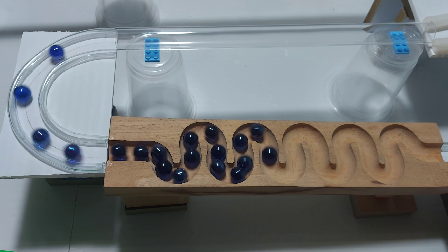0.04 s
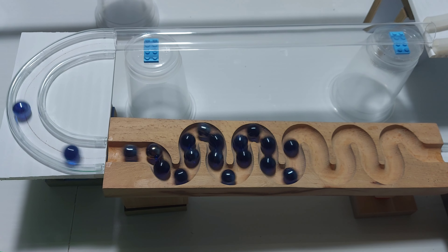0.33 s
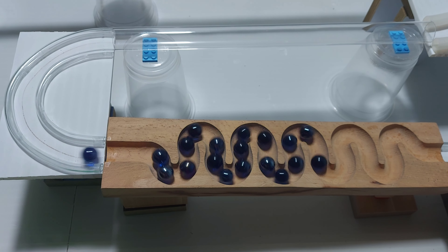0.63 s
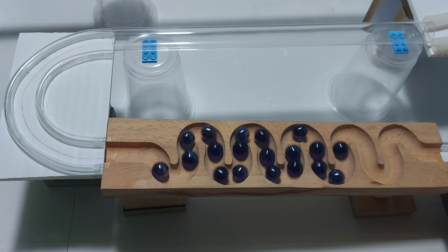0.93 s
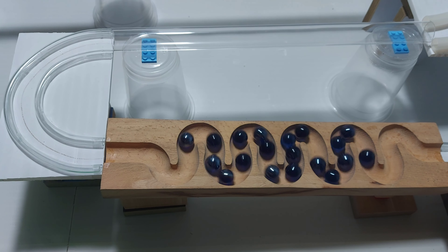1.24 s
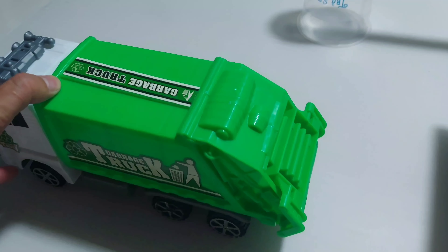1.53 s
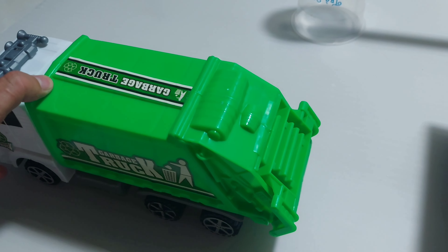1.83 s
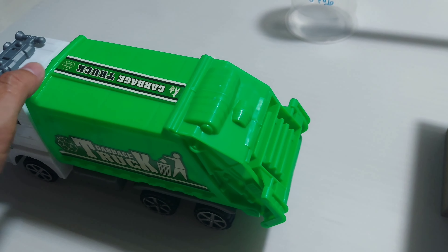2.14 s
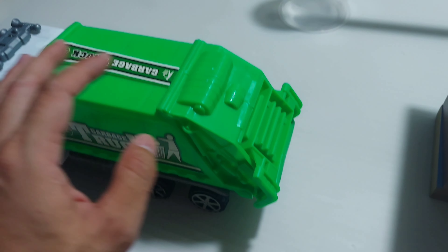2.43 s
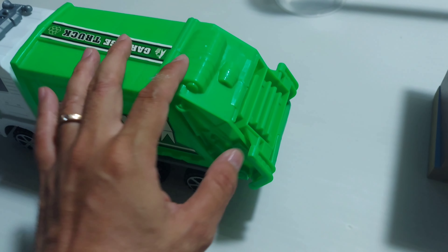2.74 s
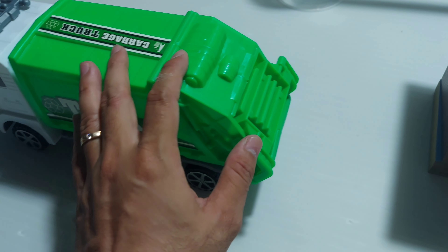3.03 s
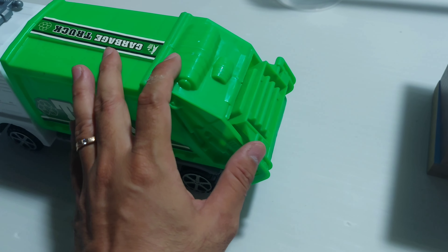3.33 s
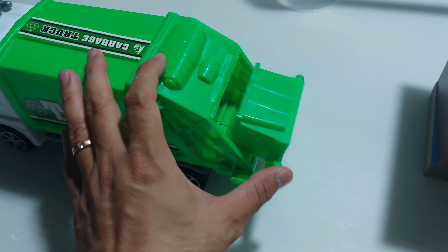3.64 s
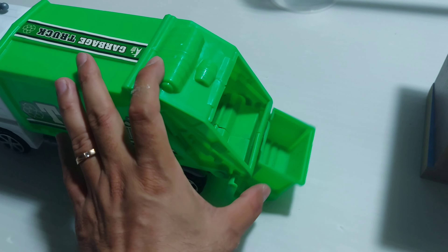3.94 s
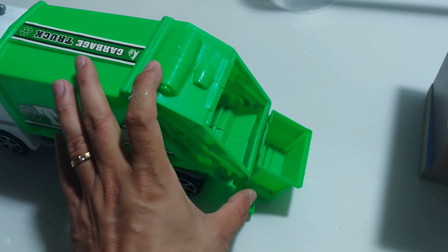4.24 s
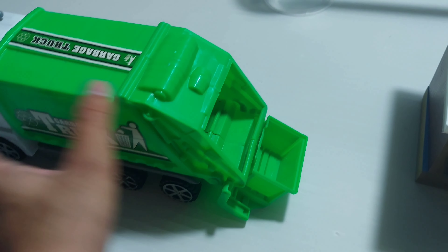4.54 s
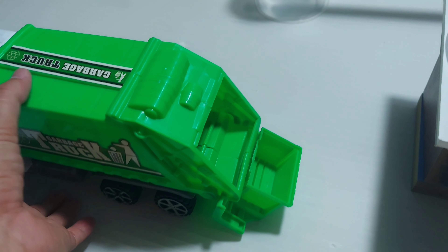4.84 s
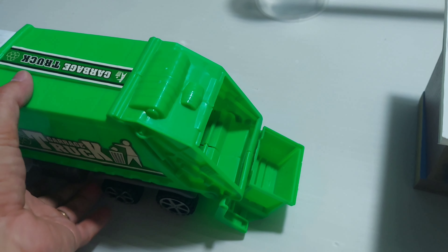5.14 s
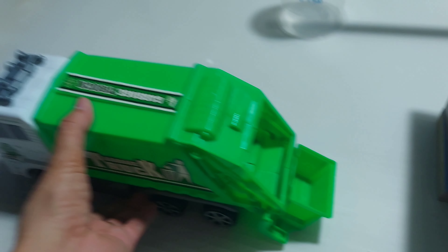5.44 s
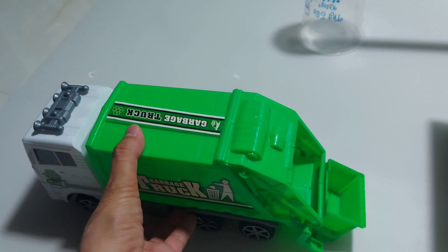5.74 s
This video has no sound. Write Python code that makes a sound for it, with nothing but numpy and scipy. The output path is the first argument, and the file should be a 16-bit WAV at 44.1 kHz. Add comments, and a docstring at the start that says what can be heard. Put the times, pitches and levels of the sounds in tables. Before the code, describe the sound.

From the start, glass marbles hum faintly around a plastic bend and drop onto a winding wooden track with loud, woody tocks until about 0.9 seconds. They roll and click brightly against each other, gradually fading. At 1.4 seconds the sound cuts abruptly to much quieter handling of a hollow plastic toy truck, with brief wheel shuffles, light knocks and dull table bumps. From about 2.3 seconds fingers rub the shell and its panels tick irregularly, with a faint squeak near 2.9. At 3.85 seconds the rear bin falls open with a sharp, hollow clack and rattles briefly on its hinge. A softer knock follows at 4.4. Rubbing, ticks and low thuds continue, and the truck slides on its wheels from about 5.5 to 5.8 seconds. Everything is heard close up in a small room, over a faint low hum and hiss.

```python
"""Marble run, then toy truck

Glass marbles hum off a plastic bend, knock onto a winding wooden track, roll and click together.
At 1.434 s the scene cuts to a hollow plastic toy truck on the same table. A hand rubs and shifts it:
skin sticks and slips, panels tick, the table thuds. The rear bin flips open with a clack and rattles.
Blows are decaying modes plus noise; rolling and rubbing are filtered trains of tiny contacts.
Small room, heard close up through two microphone ports."""
import sys
import numpy as np
from scipy import signal
from scipy.fft import rfft, irfft, next_fast_len
from scipy.io import wavfile
from scipy.ndimage import uniform_filter1d

SR = 44100
rng = np.random.default_rng(int(sys.argv[2]) if len(sys.argv) > 2 else 0)


def bounce(signal):
    """Save signal as a 16-bit WAV file at the path given by the first command-line argument."""
    frames = np.transpose(np.atleast_2d(signal))
    limited = np.clip(frames, -1, 1)
    pcm = np.round(limited * 32767).astype(np.int16)
    wavfile.write(sys.argv[1], SR, pcm)


N = 255768
TIME_S = np.arange(N) / SR
BLOW_S = np.arange(8192) / SR

# room murmur spectrum: f/Hz, level/dB
MURMUR_SPECTRUM = [(15, -60.5), (25, -28), (40, -18), (59, -2), (151, -14.5), (188, -10), (210, -10),
                   (238, -9.5), (554, -17.5), (2000, -24), (2600, -60), (4400, -120)]
# hiss spectrum: f/Hz, level/dB
HISS_SPECTRUM = [(900, -67), (1700, -11), (2200, -3.5), (2850, 5), (3300, -11), (4100, -10), (5100, -3),
                 (5700, -14), (6400, -7.5), (7500, -8.5), (8800, -13.5), (10800, -12), (13000, -26.5),
                 (16000, -46.5)]
# glass rolling on wood: f/Hz, level/dB
ROLL_SPECTRUM = [(76, -39.5), (130, -18.5), (331, -5.5), (428, -11.5), (533, -3.5), (929, -9.5), (1300, -3),
                 (1650, -14), (2100, -7), (2320, -12), (2940, -19), (3660, -25), (3960, -20.5), (7480, -32),
                 (15000, -41)]
# jostling in the marble queue: t/s, level/dB
JOSTLE_LEVELS = [(0, -36), (.17, -34.5), (.25, -40), (.4, -38.5), (.52, -45), (.72, -45), (1.05, -52),
                 (1.2, -52), (1.4, -45)]
# marbles landing and bouncing on the track: t/s, level/dB
LANDINGS = [(0.0024, -6), (0.0304, -12), (0.0567, -18.5), (0.0788, -5.5), (0.1228, -11), (0.1486, -17.5),
            (0.2302, -6.5), (0.2732, -14), (0.2996, -18.5), (0.3397, -5.5), (0.3832, -12.5), (0.5289, -6.5),
            (0.566, -10.5), (0.609, -20), (0.6526, -14), (0.7057, -24), (0.7647, -4), (0.8051, -11),
            (0.8476, -22.5), (0.887, -21.5)]
# wooden track modes: f/Hz, level/dB, t60/s
WOOD_MODES = [(308, -37, 0.059), (460, -24.5, 0.031), (646, -40, 0.08), (1246, -16, 0.023),
              (1328, -20.5, 0.028), (2075, -22.5, 0.064), (2280, -31, 0.033), (2370, -26.5, 0.036),
              (2650, -30.5, .055), (3128, -10, 0.024), (3183, 6, 0.0093), (3307, -13, 0.024),
              (3420, -26, 0.023), (3950, -32.5, 0.095), (4610, -6.5, 0.0057)]
# marble against marble: t/s, level/dB, brightness/dB
MARBLE_CLICKS = [(0.037, -12, -12), (0.059, -17.5, -5), (0.082, -16, -7), (0.1568, -15.5, -8),
                 (0.262, -16.5, -4.5), (0.3126, -11, -2), (0.3396, -16, -5), (0.3663, -16, -5),
                 (0.3876, -14.5, -8), (0.408, -10, -1), (0.4341, -14.5, -2), (0.4537, -23, -1),
                 (0.4703, -12.5, -7), (0.6183, -14.5, -13), (0.6245, -18.5, -6), (0.6475, -13.5, -8.5),
                 (0.704, -16.5, -11), (0.73, -16, -10.5), (0.8033, -14.5, -11), (0.825, -17.5, -8),
                 (0.9416, -15.5, -9), (0.991, -19.5, -11), (1.047, -25, -8), (1.1173, -19, -9.5),
                 (1.1734, -16.5, -6), (1.2282, -16.5, -8.5), (1.279, -24.5, -10), (1.3164, -25.5, -12),
                 (1.3348, -21, -5.5), (1.3645, -29, -21)]
# ring of a click in the groove: f/Hz, level/dB, t60/s
GROOVE_MODES = [(5300, -11.5, .008), (6650, -0.5, 0.0082), (7710, -2, 0.011), (8880, 4, 0.004),
                (10800, 8, 0.0032), (13300, 1.5, 0.0026)]
# fingers rubbing the truck: t/s, level/dB
RUB_LEVELS = [(1.46, -70), (2.0, -67.5), (2.6, -60.5), (2.88, -56.5), (3.2, -57), (3.6, -64), (4.0, -58.5),
              (4.6, -62), (5.8, -58.5)]
# skin on plastic: f/Hz, level/dB
RUB_SPECTRUM = [(500, -35), (850, -10.5), (1000, -3.5), (1200, -1), (1400, -7.5), (1700, -6.5), (2200, 0),
                (3200, -15.5), (4200, -16.5), (5500, -27.5), (9000, -32)]
# palm pressing on the shell: t/s, level/dB
PALM_LEVELS = [(2.5, -70), (2.85, -60.5), (3.6, -62), (4.0, -56), (4.7, -56.5), (5.8, -60.5)]
# truck and hand sliding: t/s, half width/s, wheel level/dB, skin level/dB
SLIDE_MOVES = [(1.483, 0.062, -62.5, -68), (1.739, .13, -62, -73), (4.775, .035, -76.5, -61),
               (5.595, 0.052, -58, -76), (5.79, 0.12, -59.5, -64.5)]
# hand and wheel bumps reaching the table: t/s, level/dB
TABLE_BUMPS = [(1.629, -48), (1.829, -51.5), (2.172, -54.5), (2.404, -50.5), (2.653, -59), (2.926, -66),
               (3.151, -58), (3.498, -60), (3.86, -66), (4.021, -57), (4.271, -50), (4.401, -61),
               (4.56, -48), (4.741, -43), (4.846, -47.5), (5.124, -49), (5.211, -45.5), (5.32, -45.5),
               (5.394, -49), (5.548, -40), (5.758, -42)]
# truck knocks, the bin's fall loudest: t/s, level/dB, deep boom/dB, hollow ring/dB, sharp edge/dB
TRUCK_KNOCKS = [(1.644, -56, 13, 8.5, -8), (1.741, -61.5, 12, 14, -8), (1.822, -49, 1.5, 10, -2.5),
                (1.918, -55.5, -7.5, 7.5, -13.5), (3.8485, -23.5, 6.5, 0, 5.5), (3.953, -34, -8, 7, 1),
                (4.39, -36.5, 6.5, 6.5, -4), (4.409, -44.5, 15, 6, -1), (5.614, -45, -2, -5, -20)]
# truck shell modes before extra damping: f/Hz, level/dB, t60/s
SHELL_MODES = [(307, -10.5, 0.15), (372, -5.5, 0.026), (483, -9, 0.092), (542.5, 5, 0.034), (678, 7, 0.029),
               (731, 13, 0.021), (1090, 7, 0.023), (1356, 11, 0.02), (2086, -5.5, 0.06),
               (2850, -3.5, 0.018), (3240, 21.5, 0.0029)]
# plastic ticking under the fingers: t/s, level/dB, brightness/dB
PANEL_TICKS = [(1.705, -48, 11), (2.281, -45, -31), (2.335, -49.5, 14), (2.359, -50.5, 16),
               (2.424, -41, -0.5), (2.454, -46, 11.5), (2.59, -45.5, 0), (2.938, -40.5, -2),
               (2.995, -43, -23), (3.03, -39.5, -7), (3.115, -42, 0), (3.178, -39, -12), (3.264, -38.5, -8),
               (3.3, -40.5, -22), (3.333, -41.5, -13), (3.39, -40.5, -11), (3.444, -41.5, -4.5),
               (3.714, -44, -22), (3.823, -44, -11), (4.083, -41, 2.5), (4.122, -38.5, -19),
               (4.267, -39.5, -25), (4.314, -41, -5), (4.454, -41.5, -6.5), (4.938, -38.5, -6),
               (4.977, -39, -8), (5.002, -37.5, -6), (5.182, -39.5, -1), (5.357, -37.5, -10),
               (5.739, -43.5, 9)]
# hand-damped panel modes: f/Hz, level/dB, t60/s
DAMPED_MODES = [(850, 1, 0.017), (1266, 10.5, 0.0077), (1550, -18, 0.0056), (2540, -2.5, 0.0074),
                (3170, -2, .009)]
# snap of a panel: f/Hz, level/dB
TICK_SPECTRUM = [(200, -29), (550, -14), (850, -8), (1250, -5), (1700, 10.5), (2400, 4), (3800, -7),
                 (6000, -14), (15000, -25)]
# bin chattering on its hinge: f/Hz, level/dB
RATTLE_SPECTRUM = [(150, -6), (290, 3), (400, -4), (540, -8), (900, 6), (1300, -1), (2000, 4), (3600, -1),
                   (6000, -12), (11000, -18), (16000, -24)]
# port balance for the marbles: f/Hz, left minus right/dB
MARBLE_BALANCE = [(100, 1.5), (500, 2), (1200, 2), (2100, -3), (2700, -15.5), (3300, -5.5), (4500, -6.5),
                  (6700, -16), (8300, -10), (9700, 4.5), (12000, -3), (15000, 7)]
# port balance for truck and background: f/Hz, left minus right/dB
TRUCK_ROOM_BALANCE = [(300, 2), (700, 0.5), (1300, 3), (2000, -4), (2800, -4), (4200, 4), (6500, -11),
                      (10000, 0.5), (15000, -0.5)]


def amp(db):
    """Decibels to gain."""
    return 10 ** (np.asarray(db) / 20)


def unit(x):
    """Scale to rms 1."""
    return x / np.sqrt(np.mean(x ** 2))


def peak(x):
    """Scale to peak 1."""
    return x / np.abs(x).max()


def decay(t_s, t60_s):
    """Exponential fall, 60 dB per t60_s."""
    return np.exp(-np.log(1000) * t_s / t60_s)


def onset(rise_s):
    """Smooth build-up of a blow."""
    return 1 - np.exp(-(BLOW_S / rise_s) ** 2)


def swell(at_s, half_width_s):
    """Gaussian rise and fall."""
    return np.exp(-((TIME_S - at_s) / half_width_s) ** 2)


def curve(table):
    """Timed levels, interpolated per sample."""
    return np.interp(TIME_S, *np.transpose(table))


def add(track, at_s, sound):
    """Mix a sound in at at_s."""
    start = max(int(at_s * SR), 0)
    track[..., start:start + sound.shape[-1]] += sound[..., :N - start]


def colour(x, points):
    """Minimum-phase filter through (f/Hz, level/dB) points, via the cepstrum."""
    n = x.shape[-1]
    size = next_fast_len(n // 2 + 512, True) * 2
    hz, db = np.transpose(points)
    bins_hz = np.maximum(np.fft.rfftfreq(size, 1 / SR), 1)
    gain = amp(np.interp(np.log(bins_hz), np.log(hz), db))
    cepstrum = irfft(np.log(gain))
    cepstrum[1:size // 2] *= 2
    cepstrum[size // 2 + 1:] = 0
    return irfft(rfft(x, size) * np.exp(rfft(cepstrum)))[..., :n]


def noise(likeness, size=N):
    """Stereo white noise; likeness is the left-right correlation."""
    mid, side = rng.standard_normal((2, size))
    return np.sqrt((1 + likeness) / 2) * mid + np.sqrt((1 - likeness) / 2) * np.array([side, -side])


def grains(per_s, spread_db, likeness):
    """Tiny random contacts of uneven size."""
    strength = amp(spread_db * np.minimum(rng.exponential(size=N), 4))
    return noise(likeness) * strength * (rng.random(N) < per_s / SR)


def ring(modes, rise_s, detune, scatter_db, apart_hz, disorder_rad):
    """Struck modes; each contact point weights and phases them anew."""
    hz, db, t60_s = np.transpose(modes)[:, :, None]
    tune, weight, phase, turn = rng.standard_normal((4, len(modes), 1))
    # short waves reach the two ports by different paths
    skew_rad = np.array([turn, -turn]) * np.minimum(np.sqrt(hz / apart_hz), 1)
    waves = np.sin(2 * np.pi * hz * (1 + detune * tune) * BLOW_S + disorder_rad * phase + skew_rad)
    return onset(rise_s) * np.sum(amp(db + scatter_db * weight) * decay(BLOW_S, t60_s) * waves, axis=1)


def crack(t60_s, likeness):
    """A blow's short, overlapping modes as a noise burst."""
    return noise(likeness, len(BLOW_S)) * decay(BLOW_S, t60_s)


def room(x, near_db, near_t60_s, far_db, far_t60_s, treble_db):
    """Add quick reflections off table and toys, then the room tail."""
    t_s = np.arange(SR // 2) / SR
    near = unit(noise(.27, len(t_s)) * decay(t_s, near_t60_s) * (t_s > .002))
    far = unit(noise(.6, len(t_s)) * decay(t_s, far_t60_s) * (t_s > .008))
    echo = amp(near_db) * near + amp(far_db) * colour(far, [(3500, .006), (12000, treble_db)])
    return x + signal.fftconvolve(x, echo / np.sqrt(len(t_s)), axes=1)[:, :N]


def shade(x, balance):
    """The microphone body colours each port differently."""
    left = colour(x[0], [(hz, db / 2) for hz, db in balance])
    right = colour(x[1], [(hz, -db / 2) for hz, db in balance])
    return np.array([left, right])


def ports(x, lag_ms):
    """Sound reaches the right port later."""
    delay = np.exp(-2j * np.pi * np.fft.rfftfreq(N, 1 / SR) * lag_ms / 1000)
    return np.array([x[0], irfft(rfft(x[1]) * delay, N)])


def background(murmur_db=-63.5, hiss_db=-65):
    """Low room murmur and faint hiss."""
    murmur = unit(colour(noise(.87), MURMUR_SPECTRUM))
    hiss = unit(colour(noise(.047), [(300, -29)] + HISS_SPECTRUM))
    return amp(murmur_db) * murmur + amp(hiss_db) * hiss


def rolling(roll_db=-38.5, fade_db_per_s=5.5, scrape_db=-43.5, chatter_db=-5, rumble_db=-51):
    """Slowing marbles bump over the wood grain, jostle and shake the table; one scrapes a wall."""
    slowing = amp(roll_db - fade_db_per_s * TIME_S)
    scrape = amp(scrape_db) * swell(at_s=1.157, half_width_s=.017)
    roll = unit(colour(grains(per_s=3000, spread_db=0, likeness=.93), ROLL_SPECTRUM))
    jostle = amp(curve(JOSTLE_LEVELS) + chatter_db)
    touches = grains(per_s=220, spread_db=3, likeness=.4)
    chatter = colour(touches, [(2500, -17.5), (5000, -19), (7200, 3), (11000, -3.5), (16000, -14)])
    chatter = unit(room(chatter, near_db=3.5, near_t60_s=.036, far_db=-25, far_t60_s=.3, treble_db=-11))
    load = np.clip((TIME_S - .2) / .15, .3, 1)  # the queue rolls onto the wood
    rumble = unit(colour(noise(1), [(15, -35.5), (28, -17.5), (45, -18.5), (62, 4), (85, -1),
                                    (115, -11.5), (200, -25), (600, -72)]))
    return (slowing + scrape) * roll + jostle * chatter + amp(rumble_db) * load * rumble


def bend(level_db=-47, empty_s=.59, release_s=.18):
    """The thin plastic bend hums until the last marble leaves it."""
    filled = np.clip((empty_s - TIME_S) / release_s, 0, 1)
    hum = colour(noise(1), [(150, -34.5), (300, 3), (450, 2), (600, -17), (1000, -36), (4000, -66)])
    return amp(level_db) * filled * unit(hum)


def drops(crack_db=-14, hardening=.14, lead_s=.00042, beam_db=5):
    """Each landing rings the track with a woody tock; harder ones crack more."""
    out = np.zeros((2, N))
    loudest_db = max(db for _, db in LANDINGS)
    grit_spectrum = [(200, -12), (600, -20), (1300, -3.5), (3000, .5), (4900, .5), (6000, -9.5),
                     (12000, -14.5)]
    for at_s, db in LANDINGS:
        tock = ring(WOOD_MODES, rise_s=.002, detune=.001, scatter_db=1.5, apart_hz=30000,
                    disorder_rad=.2)
        grit = peak(colour(crack(t60_s=.045, likeness=1), grit_spectrum))
        grit_db = crack_db + hardening * (db - loudest_db)
        add(out, at_s - lead_s, amp(db) * (peak(tock) + amp(grit_db) * grit))
    # the groove beams its main mode at the microphone, so the room gets less of it
    spread = colour(out, [(2700, .0022), (3050, -beam_db), (3350, -beam_db), (3800, .0087)])
    beamed = out - spread
    return beamed + room(spread, near_db=-14, near_t60_s=.015, far_db=-6.5, far_t60_s=.7, treble_db=-18.5)


def clicks(gain_db=-2, ring_db=-3):
    """Glass on glass: a broad snap with a brief ring."""
    out = np.zeros((2, N))
    snap_spectrum = [(1000, -25), (3500, -2), (6000, 5.5), (11000, 6.5), (16000, -13.5)]
    for at_s, db, bright_db in MARBLE_CLICKS:
        groove = ring(GROOVE_MODES, rise_s=.0007, detune=.053, scatter_db=3, apart_hz=13680,
                      disorder_rad=1.6)
        snap = peak(colour(crack(t60_s=.011, likeness=.3), snap_spectrum))
        tone = [(7800, .007), (11000, bright_db + 5), (15500, bright_db + 9)]
        add(out, at_s, amp(db + gain_db) * colour(snap + amp(ring_db) * peak(groove), tone))
    return room(out, near_db=-9, near_t60_s=.036, far_db=-16.5, far_t60_s=.24, treble_db=0)


def hand(creak_db=-4, palm_db=-1, tremor_db=-4, tremor_left_db=-1.5):
    """Skin sticks and slips on plastic; the palm rubs lower and makes the table tremble."""
    slips = grains(per_s=4000, spread_db=2.5, likeness=.55)
    creaks = grains(per_s=160, spread_db=1.2, likeness=.7)
    rub = unit(colour(slips, RUB_SPECTRUM)) + amp(creak_db) * unit(colour(creaks, RUB_SPECTRUM))
    palm = unit(colour(noise(1), [(450, -23), (640, 0), (780, 4), (950, -4), (1400, -3), (3000, -40)]))
    tremor = unit(colour(noise(.88), [(15, -31), (28, -28), (45, 4), (61, 10), (90, 1), (140, -10.5),
                                      (220, -28), (600, -66)]))
    pan = amp([[tremor_left_db], [-tremor_left_db]])
    pressing = amp(palm_db) * palm + amp(tremor_db) * tremor * pan
    return amp(curve(RUB_LEVELS)) * rub + amp(curve(PALM_LEVELS)) * pressing


def slides():
    """The truck shuffles on its wheels; skin hisses along its side."""
    contacts = grains(per_s=1300, spread_db=0, likeness=.94)
    wheels = unit(colour(contacts, [(120, -14.5), (280, -11), (460, 2), (600, -7), (1000, -14),
                                    (4000, -44)]))
    skin = unit(colour(noise(.17), [(2000, -47), (5500, 0), (7700, 11), (11000, 6), (16000, 5)]))
    return sum(swell(at_s, half_width_s) * (amp(wheel_db) * wheels + amp(skin_db) * skin)
               for at_s, half_width_s, wheel_db, skin_db in SLIDE_MOVES)


def bumps(table_hz=62, rise_s=.012, t60_s=.17, detune=.032, thud_db=-6):
    """Each bump sways the table top at its lowest mode, under a dull thud."""
    out = np.zeros((2, N))
    thud_spectrum = [(25, -36), (70, -3.5), (130, 0), (220, -22), (600, -43.5), (2000, -89)]
    for (at_s, db), tune in zip(TABLE_BUMPS, rng.standard_normal(len(TABLE_BUMPS))):
        sway = np.sin(2 * np.pi * table_hz * (1 + detune * tune) * BLOW_S) * decay(BLOW_S, t60_s)
        thud = peak(colour(crack(t60_s=.12, likeness=1), thud_spectrum))
        add(out, at_s, amp(db) * peak(onset(rise_s) * (sway + amp(thud_db) * thud)))
    return colour(out, [(20, -23), (50, -1)])


def knocks(gain_db=5, crack_db=-2, ring_s=.23, rebound_s=.0044, rebound_db=-7.5):
    """Each knock cracks and booms in the hollow shell; the loose plastic rebounds once."""
    out = np.zeros((2, N))
    crack_spectrum = [(300, 16), (1000, 5.5), (4000, 30.5), (8000, 10), (16000, 8)]
    for at_s, db, deep_db, hollow_db, sharp_db in TRUCK_KNOCKS:
        shell = ring(SHELL_MODES, rise_s=.0029, detune=.013, scatter_db=0, apart_hz=13700,
                     disorder_rad=.98)
        shell = peak(shell * np.exp(-BLOW_S / (ring_s * amp(hollow_db))))
        snap = peak(colour(crack(t60_s=.035, likeness=.85), crack_spectrum))
        tone = [(100, -14.5), (190, deep_db - 4.5), (290, deep_db), (430, hollow_db + 3),
                (560, hollow_db + 3), (800, -3.5), (4000, -5), (6500, sharp_db + 3)]
        add(out, at_s, amp(db + gain_db) * colour(shell + amp(crack_db) * snap, tone))
        rebound = peak(colour(crack(t60_s=.035, likeness=.85), crack_spectrum))
        rebound = colour(rebound, [(3500, 6.5), (8000, -36)])
        add(out, at_s + rebound_s, amp(db + gain_db + rebound_db) * rebound)
    return room(out, near_db=-6, near_t60_s=.028, far_db=-5.5, far_t60_s=.54, treble_db=-4.5)


def ticks(gain_db=1):
    """A fingertip slips and the panel snaps back, damped by the hand."""
    out = np.zeros((2, N))
    for at_s, db, bright_db in PANEL_TICKS:
        panel = ring(DAMPED_MODES, rise_s=.0008, detune=.08, scatter_db=3, apart_hz=20000,
                     disorder_rad=.7)
        snap = colour(crack(t60_s=.03, likeness=.6), TICK_SPECTRUM)
        tick = colour(peak(panel) + peak(snap), [(2500, 0), (6000, bright_db)])
        add(out, at_s, amp(db + gain_db) * tick)
    return room(out, near_db=-10, near_t60_s=.058, far_db=-36, far_t60_s=.59, treble_db=-9)


def squeak(at_s=2.9, half_width_s=.1, panel_hz=1225, level_db=-58):
    """A fingertip drags over the roof; fast stick-slip rings one narrow panel resonance."""
    b, a = signal.iirpeak(panel_hz, Q=14, fs=SR)
    slips = grains(per_s=660, spread_db=1, likeness=.62)
    return amp(level_db) * swell(at_s, half_width_s) * unit(signal.lfilter(b, a, slips))


def rattle(start_s=3.855, hold_s=.1, t60_s=.45, level_db=-50):
    """The fallen bin chatters on its hinge, then settles."""
    age_s = TIME_S - start_s
    fade = (age_s > 0) * decay(np.maximum(age_s - hold_s, 0), t60_s)
    chatter = grains(per_s=2500, spread_db=1.5, likeness=.5)
    return amp(level_db) * fade * unit(colour(chatter, RATTLE_SPECTRUM))


def scene(cut_s=1.434, shift_s=4.3, shift_db=6, hand_lag_ms=.26):
    """Marbles, then truck, over a steady background."""
    marbles = drops() + clicks() + rolling() + bend()
    marbles = ports(shade(marbles, MARBLE_BALANCE), lag_ms=.24)
    # the bumps pan left as the hand moves to that side
    left_db = uniform_filter1d(np.where(TIME_S < shift_s, 0., shift_db), SR // 4)
    thuds = bumps() * amp(np.array([left_db, -left_db]) / 2)
    clatter = ports(knocks() + rattle(), lag_ms=.098)
    handling = ports(hand() + ticks() + squeak() + slides() + thuds, hand_lag_ms)
    ambience = ports(background(), hand_lag_ms)
    marble_gate = np.clip((cut_s - TIME_S) / .002, 0, 1)
    truck_gate = np.clip((TIME_S - cut_s - .01) / .005, 0, 1)
    truck = truck_gate * (clatter + handling)
    return marble_gate * marbles + shade(truck + ambience, TRUCK_ROOM_BALANCE)


def record(dry):
    """Steep low-pass at 16.2 kHz."""
    return signal.sosfilt(signal.ellip(8, .2, 70, 16200, fs=SR, output="sos"), dry)


dry = scene()
out = record(dry)
bounce(out)
```